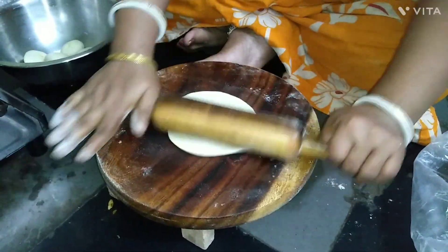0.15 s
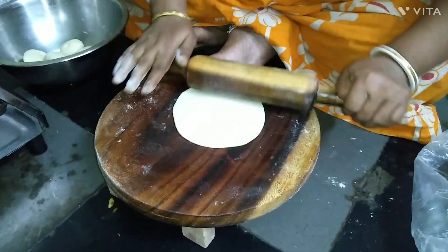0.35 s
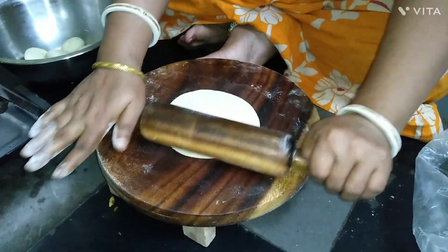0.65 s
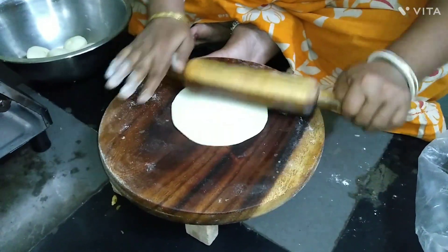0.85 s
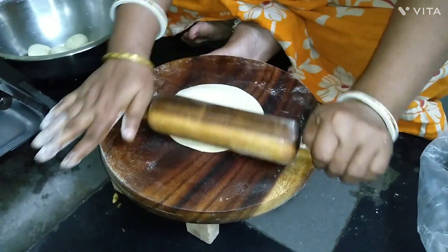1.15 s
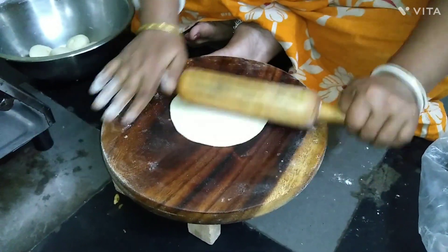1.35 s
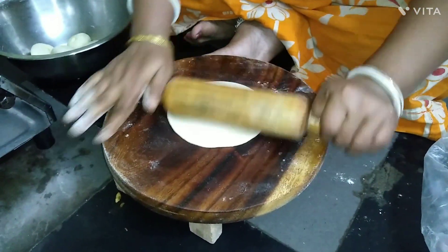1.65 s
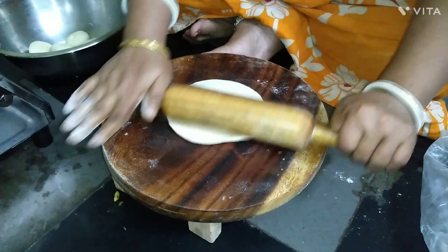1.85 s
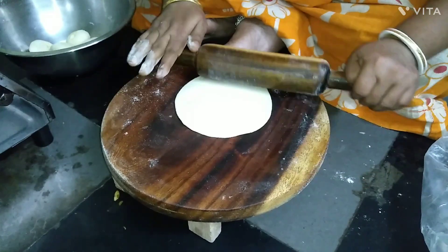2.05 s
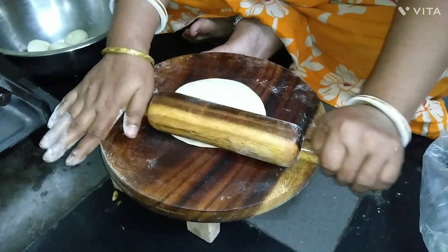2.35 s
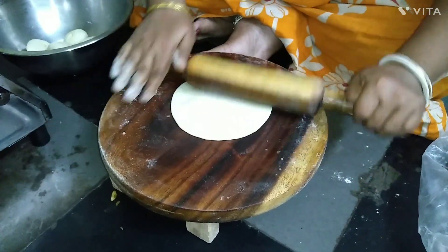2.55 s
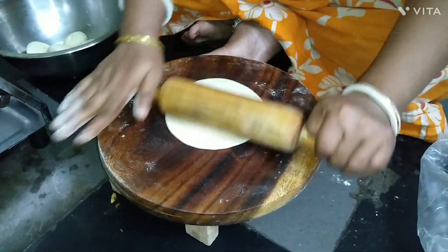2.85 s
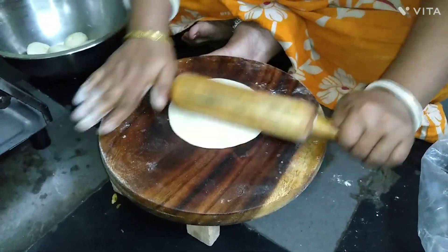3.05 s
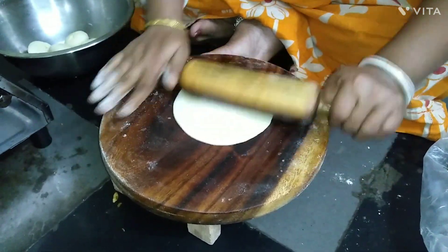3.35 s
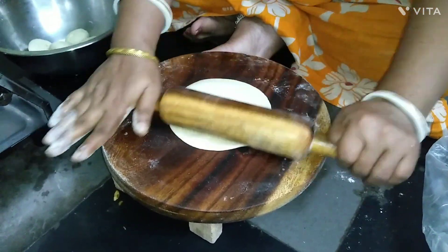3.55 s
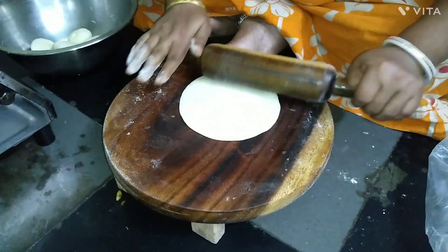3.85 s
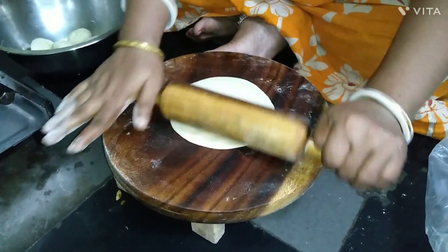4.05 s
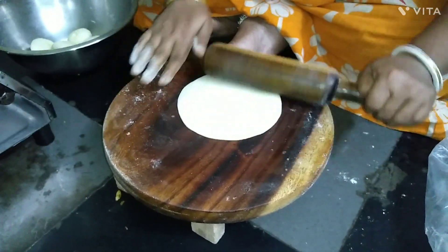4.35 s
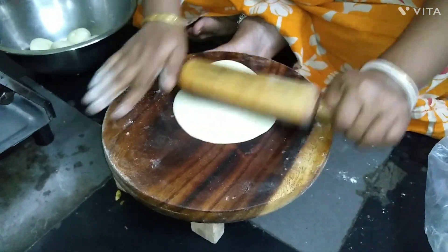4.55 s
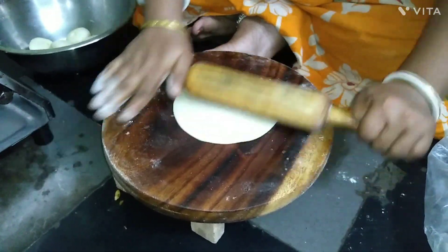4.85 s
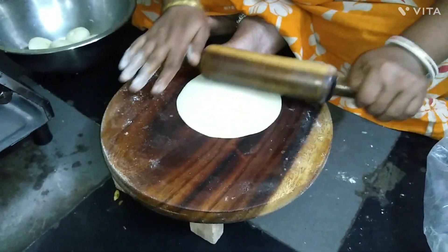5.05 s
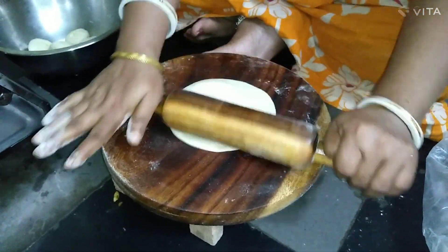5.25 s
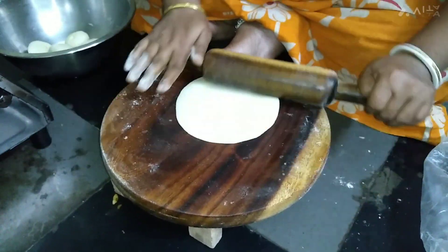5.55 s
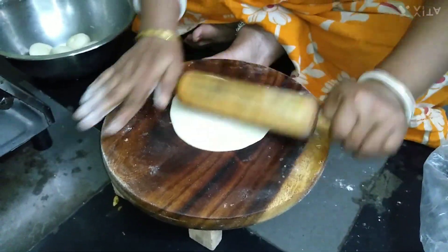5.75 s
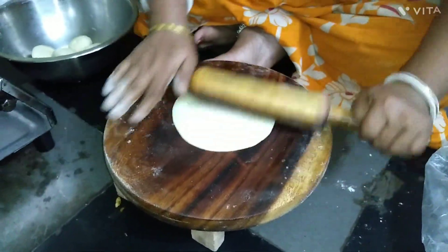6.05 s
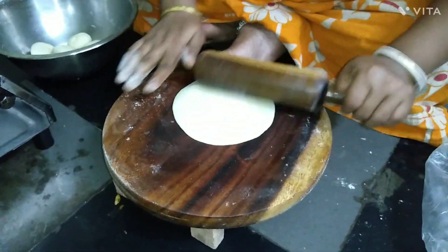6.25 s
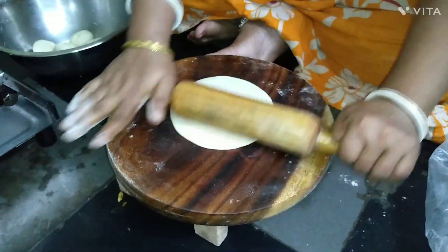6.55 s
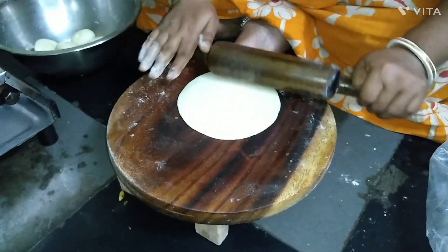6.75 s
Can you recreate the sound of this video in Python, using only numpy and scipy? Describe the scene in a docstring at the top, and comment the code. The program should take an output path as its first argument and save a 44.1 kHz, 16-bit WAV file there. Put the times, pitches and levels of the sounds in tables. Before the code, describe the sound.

Rhythmic dough rolling on a footed wooden board: handles rub in the palms, flour hisses, bangles snap and chatter, and the board thuds hollowly on its foot. Quieter return strokes creak between pushes. The pin taps the board once before the middle, and later a faint vehicle horn blares outdoors. Low hum, soft floor thumps and quiet air sit beneath, picked up by a close stereo microphone with a short room reflection.

```python
"""Bangles clack over the rub of a wooden rolling pin, worked to and fro on dough on a round, footed board.
Shaped noise rubs, hisses and swishes with each stroke; noise bursts make the clacks near top push speed.
The board rocks in decaying modes, its hollow creaks with stick-slip on the return, and the pin taps it once.
A harmonic horn blasts once far outside; a low hum, floor thumps and air lie under a small hard room.
Two differently tuned microphone ports pick it all up."""
import sys
import numpy as np
from scipy import signal
from scipy.fft import rfft, irfft
from scipy.io import wavfile
from scipy.ndimage import uniform_filter1d

SR = 44100
rng = np.random.default_rng(int(sys.argv[2]) if len(sys.argv) > 2 else 0)


def wav_out(sig):
    """Save sig, one row per channel (or a flat mono array), as 16-bit PCM at SR to the path in sys.argv[1]."""
    wavfile.write(sys.argv[1], SR, np.round(np.clip(np.atleast_2d(sig).T, -1, 1) * 32767).astype(np.int16))


N = 304290
TIME = np.arange(N) / SR


def undb(db):
    """Decibels to amplitude gain."""
    return 10 ** (np.asarray(db) / 20)


def unit(x):
    """Scale to rms 1."""
    return x / np.sqrt(np.mean(x ** 2))


def colour(x, points, size=4096):
    """Minimum-phase filter through (freq_hz, gain_db) points, built by folding the cepstrum."""
    freq_hz, gain_db = np.transpose(points)
    grid_hz = np.maximum(np.fft.rfftfreq(size, 1 / SR), 1)
    grid_db = np.interp(np.log(grid_hz), np.log(freq_hz), gain_db)
    cepstrum = irfft(np.log(undb(grid_db)))
    cepstrum[1:size // 2] *= 2
    cepstrum[size // 2 + 1:] = 0
    response = irfft(np.exp(rfft(cepstrum)))
    response = response.reshape((1,) * (x.ndim - 1) + (-1,))
    return signal.fftconvolve(x, response, axes=-1)[..., :x.shape[-1]]


def fade(t_s, t60_s):
    """Exponential decay, 60 dB down at t60_s."""
    return np.exp(-np.log(1000) * t_s / t60_s)


def walk(rate_hz):
    """Random wander: straight lines between normal draws made rate_hz times a second."""
    knots_s = np.arange(0, N / SR + 1, 1 / rate_hz)
    return np.interp(TIME, knots_s, rng.standard_normal(len(knots_s)))


def swell(middle_s, half_s):
    """Speed of one stroke: it gathers, peaks at 1 and dies away, 1/e at half_s either side."""
    return np.exp(-np.minimum(np.abs((TIME - middle_s) / half_s), 20) ** 1.5)


def add(track, start_s, sound):
    """Mix a sound into a track at a time."""
    start = max(int(start_s * SR), 0)
    part = track[..., start:start + sound.shape[-1]]
    part += sound[..., :part.shape[-1]]


def grains(per_s, spread_db):
    """Dense tiny slips of uneven size, drawn independently for each port."""
    slips = (rng.random((2, N)) < per_s / SR) * rng.standard_normal((2, N))
    boost = np.minimum(rng.exponential(size=(2, N)), 4)
    return slips * undb(spread_db * boost)


# long strokes: clack_s, rub_lead_s, rub_db, swish_db, clack_db, clack_body_db (below 7 kHz against treble)
PUSH_STROKES = [(0.0465, 0.015, -41, -45.5, -34.5, 4.5), (0.604, 0.0065, -46, -50.5, -46, 7.5),
                (1.2097, 0.052, -51.5, -54.5, -31, -10), (1.754, 0.022, -45.5, -55.5, -35.5, -9.5),
                (2.3392, 0.019, -50, -49.5, -31.5, -9.5), (2.9284, 0.02, -48, -49.5, -29.5, -6.5),
                (3.5014, 0.0068, -46.5, -48.5, -28, -10.5), (4.0805, 0.024, -52, -49.5, -32, -9),
                (4.689, 0.0064, -45.5, -48, -32, -0.5), (5.285, 0.034, -47.5, -47, -28, -7),
                (5.8723, 0.03, -47.5, -50.5, -31, -7.5), (6.4473, 0.027, -50, -49.5, -31, -7)]
# lighter strokes back: middle_s, effort_db
RETURN_STROKES = [(0.329, 2), (0.894, 2.5), (1.452, -0.5), (2.025, 1.2), (2.606, -0.5), (3.185, -4),
                  (3.776, -3.5), (4.352, -3), (4.957, 2), (5.551, -2.5), (6.138, -5), (6.722, -1)]
# handles in the palms: freq_hz, gain_db
RUB_SPECTRUM = [(200, -16.5), (900, -31.5), (1500, -18), (1900, -4), (2300, 4), (2650, -0.5), (3300, -17.5),
                (5000, -18), (16000, -65.5)]
# low wooden grain: freq_hz, gain_db
GRAIN_SPECTRUM = [(500, -11), (900, -19), (1250, -14.5), (1500, 5.5), (1750, 2), (2100, -1.5),
                  (4000, -43.5)]
# flour under the pin: freq_hz, gain_db
HISS_SPECTRUM = [(800, -17.5), (2500, 0), (3400, -8.5), (4750, -6), (5250, 2), (5650, 0.5), (6400, -8),
                 (7500, -4.5), (10000, -41.5), (16000, -33)]
# sliding bangles: freq_hz, gain_db
SWISH_SPECTRUM = [(2000, -19), (5000, -3.5), (7500, 2.5), (9000, 0), (11000, 0.5), (13500, -5),
                  (16000, -19)]
# in a push the handles rub first, then the bangles clack, then hiss and swish peak
SLIDE_LAG_S = 0.021
PUSH_HALF_S, SLIDE_HALF_S, SWISH_HALF_S, RETURN_HALF_S = 0.055, 0.059, 0.055, 0.055
PUSH_HISS_DB, PUSH_GRAIN_RE_RUB_DB = -51, -13
# return levels at 0 dB effort; swish grows faster than effort, rub slower
RETURN_RUB_DB, RETURN_GRAIN_DB, RETURN_HISS_DB, RETURN_SWISH_DB = -56, -56, -57, -66
SWISH_DB_PER_DB, RUB_DB_PER_DB = 2.6, 0.33


def rolling(uneven_db=3.0, slide_uneven_db=2, shift=0.038):
    """Handles rub in the palms, flour hisses and bangles slide: slip noise follows stroke speed; grip wavers."""
    rub_gain = grain_gain = hiss_gain = swish_gain = 0
    for clack_s, lead_s, rub_db, swish_db, _, _ in PUSH_STROKES:
        turning = swell(clack_s - lead_s, PUSH_HALF_S)
        slide_s = clack_s + SLIDE_LAG_S
        rub_gain = rub_gain + undb(rub_db) * turning
        grain_gain = grain_gain + undb(rub_db + PUSH_GRAIN_RE_RUB_DB) * turning
        hiss_gain = hiss_gain + undb(PUSH_HISS_DB) * swell(slide_s, SLIDE_HALF_S)
        swish_gain = swish_gain + undb(swish_db) * swell(slide_s, SWISH_HALF_S)
    for middle_s, effort_db in RETURN_STROKES:
        speed = swell(middle_s, RETURN_HALF_S)
        rub_effort_db = RUB_DB_PER_DB * effort_db
        rub_gain = rub_gain + undb(RETURN_RUB_DB + rub_effort_db) * speed
        grain_gain = grain_gain + undb(RETURN_GRAIN_DB + rub_effort_db) * speed
        hiss_gain = hiss_gain + undb(RETURN_HISS_DB + effort_db) * speed
        swish_gain = swish_gain + undb(RETURN_SWISH_DB + SWISH_DB_PER_DB * effort_db) * speed
    # changing pressure slides the pitch of the rub: read the noise at a varying rate
    travel = np.cumsum(1 + shift * walk(22)) % N
    steady_rub = colour(grains(5000, 0.37), RUB_SPECTRUM)
    scrape = np.array([np.interp(travel, np.arange(N), port) for port in steady_rub])
    rub = rub_gain * unit(scrape)
    grain = grain_gain * unit(colour(grains(2000, 0.91), GRAIN_SPECTRUM))
    hiss = hiss_gain * unit(colour(grains(10000, 1.1), HISS_SPECTRUM))
    swish = swish_gain * unit(colour(grains(16000, 1.5), SWISH_SPECTRUM))
    gripped = (rub + grain) * undb(uneven_db * walk(70))
    sliding = (hiss + swish) * undb(slide_uneven_db * walk(120))
    return gripped + sliding


# light touches, full before a clack and thin as the hands turn: start_s, level_db, body_db
BANGLE_TOUCHES = [(0.5883, -46.5, 10.5), (0.6993, -41.5, -18), (1.0105, -56.5, -24), (1.172, -58, 15.5),
                  (1.5793, -46.5, -43), (2.307, -54, 11), (2.7781, -56.5, -14), (3.3277, -54.5, -29),
                  (5.8392, -52, 10.5)]
# bangle contact: freq_hz, gain_db
BANGLE_SPECTRUM = [(300, -67), (1200, -12.5), (2200, -2), (3600, 9.5), (6000, 2), (9000, 10), (12000, -4),
                   (16000, -11)]


def bangles(clack_db=3.5, snap_t60_s=0.01, chatter_db=-15, chatter_t60_s=0.18, body_share=0.78,
            port_tilt_db=-1, thin_db=-13, sparkle_db=11):
    """Bangles snap together and chatter: noise with a fast and a slow decay, body set per contact."""
    t = TIME[:SR // 8]
    snap = fade(t, snap_t60_s) + undb(chatter_db) * fade(t, chatter_t60_s)
    body_filter = signal.butter(2, 7000, fs=SR, output="sos")
    track = np.zeros((2, N))
    clacks = [(s, db, body_db) for s, _, _, _, db, body_db in PUSH_STROKES]
    for start_s, level_db, body_db in clacks + BANGLE_TOUCHES:
        contact = rng.standard_normal((2, len(t))) * snap
        body = signal.sosfiltfilt(body_filter, contact)
        body_gain = undb(body_share * (body_db + 6.5))
        contact = contact + (body_gain - 1) * body
        # the thinnest contacts gain treble above 10 kHz
        thinness = np.clip(body_db / thin_db - 1, 0, 1)
        contact = colour(contact, [(9300, 0), (10800, thinness * sparkle_db)])
        add(track, start_s, contact * undb(level_db + clack_db))
    return colour(track, BANGLE_SPECTRUM) * undb([[port_tilt_db], [-port_tilt_db]])


# board rocking onto its foot: start_s, level_db
BOARD_KNOCKS = [(0.0681, -30), (0.6514, -34), (1.224, -32), (1.7965, -34.5), (2.402, -45), (2.9603, -43),
                (3.5348, -32), (4.1508, -39), (4.7164, -31.5), (5.2986, -35.5), (5.9231, -42.5)]
# board modes: freq_hz, level_db, t60_s
BOARD_MODES = [(272, 4.5, 0.078), (323.6, 1.5, 0.06), (400.3, -2, 0.065), (627.6, -2, 0.078),
               (661, 2, 0.039), (726, -8.5, 0.13), (886, -46, 0.065), (1150, -6, 0.073), (1431, -7, 0.049),
               (1543, -3, 0.061)]
# dull contact noise: freq_hz, gain_db
THUD_SPECTRUM = [(60, -17.5), (180, -13), (280, 11), (480, -1.5), (680, 0), (900, -2), (1450, -4),
                 (1900, -27), (4000, -24.5), (12000, -68.5)]
# knocks above the even level are brighter
EVEN_KNOCK_DB, HARDNESS_DB_PER_DB = -36, 0.97


def knocks(ring_db=-6, thud_db=13, thud_t60_s=0.0059, rattle_db=-15, rattle_t60_s=0.097,
           bounce_s=0.002858, first_db=-5):
    """The foot touches, lands fully a moment later and rattles: modes plus noise, brighter when harder."""
    t = TIME[:SR // 4]
    track = np.zeros(N)
    contact = fade(t, thud_t60_s) + undb(rattle_db) * fade(t, rattle_t60_s)
    for start_s, level_db in BOARD_KNOCKS:
        chance = rng.standard_normal((len(BOARD_MODES), 2))
        ring = 0
        # the weight of the hands shifts each mode a little
        for (freq_hz, mode_db, t60_s), (detune, place) in zip(BOARD_MODES, chance):
            tone = np.sin(2 * np.pi * freq_hz * (1 + 0.014 * detune) * t)
            ring = ring + undb(mode_db + 1.1 * place) * fade(t, t60_s) * tone
        # two independent thuds: first touch and landing share the ring
        thuds = colour(rng.standard_normal((2, len(t))) * contact, THUD_SPECTRUM)
        tilt_db = HARDNESS_DB_PER_DB * (level_db - EVEN_KNOCK_DB)
        tilt = [(330, -tilt_db / 2), (650, tilt_db / 3), (1400, tilt_db)]
        blows = undb(ring_db) * ring + undb(thud_db) * thuds
        touch, landing = undb(level_db) * colour(blows, tilt)
        add(track, start_s, undb(first_db) * touch)
        add(track, start_s + bounce_s, landing)
    return track


# board creaking under the returning pin: middle_s, half_s, level_db
BOARD_CREAKS = [(0.232, 0.012, -51), (0.314, 0.023, -46), (0.846, 0.039, -52), (1.414, 0.034, -48.5),
                (2.019, 0.021, -52.5), (2.57, 0.075, -57.5), (3.19, 0.048, -62), (3.791, 0.032, -47),
                (5.56, 0.032, -56.5), (6.134, 0.031, -44), (6.24, 0.066, -60), (6.684, 0.03, -44)]
# hollow under the board: freq_hz, gain_db
CREAK_SPECTRUM = [(150, -41.5), (270, -5), (400, -3), (475, 2.5), (620, -1), (780, -32), (1100, -21),
                  (2500, -55)]


def creaks(creak_db=-1, slip_hz=118, jitter=0.2):
    """Uneven stick-slip pulses and steady drag noise sound the hollow under the board."""
    phase = np.cumsum(slip_hz * np.exp(jitter * walk(150))) / SR
    slips = np.diff(np.floor(phase), prepend=0) * undb(walk(90))
    voice = colour(unit(slips) + rng.standard_normal(N), CREAK_SPECTRUM)
    # the hands keep the load even: level out over 1/30 s so only the stroke sets loudness
    voice = voice / np.sqrt(uniform_filter1d(voice ** 2, size=SR // 30))
    stroke_gain = sum(undb(db + creak_db) * swell(s, half_s) for s, half_s, db in BOARD_CREAKS)
    return voice * stroke_gain


# pin tapping the board: start_s, level_db
PIN_TAPS = [(2.6064, -30.5)]


def taps(tap_db=6, contact_s=0.00078, pitch_hz=2150, t60_s=0.012, crack=0.22):
    """Bare wood on wood: a short, dry decaying sine with some grain noise."""
    t = TIME[:SR // 10]
    track = np.zeros(N)
    envelope = np.minimum(t / contact_s, 1) * fade(t, t60_s)
    for start_s, level_db in PIN_TAPS:
        noise = unit(colour(rng.standard_normal(len(t)), GRAIN_SPECTRUM))
        note = np.sin(2 * np.pi * pitch_hz * t) + crack * noise
        add(track, start_s, undb(level_db + tap_db) * envelope * note)
    return track


# horn harmonics: harmonic_number, level_db
HORN_HARMONICS = [(1, -13), (6, -11.5), (7, -1), (8, 3.5), (9, -5), (10, -14)]
HORN_START_S, HORN_HOLD_S, HORN_ATTACK_S, HORN_T60_S, HORN_DB = 4.69, 0.38, 0.025, 0.73, -56


def horn(pitch_hz=389, flutter_db=3.3, waver=0.0027):
    """A vehicle horn's buzzing diaphragm far outside; echoes on the way flutter each harmonic on its own."""
    phase = 2 * np.pi * np.cumsum(pitch_hz * (1 + waver * walk(40))) / SR
    ports = np.zeros((2, N))
    for port in ports:
        for number, level_db in HORN_HARMONICS:
            flutter = undb(level_db + flutter_db * walk(45))
            port += flutter * np.sin(number * phase + 1.2 * walk(40))
    t = TIME - HORN_START_S
    attack = np.clip(t / HORN_ATTACK_S, 0, 1)
    blast = attack * fade(np.maximum(t - HORN_HOLD_S, 0), HORN_T60_S)
    return ports * blast * undb(HORN_DB)


# appliance hum: pitch_hz, rms_db
HUM_TONES = [(60.5, -63), (115, -63.5), (162, -74)]
# weight shifting on board and floor: middle_s, half_s, level_db
WEIGHT_SHIFTS = [(0.12, 0.059, -44), (0.456, 0.082, -52), (1.546, 0.033, -46.5), (2.344, 0.038, -48),
                 (2.78, 0.081, -52), (4.007, 0.074, -46), (4.194, 0.023, -44), (4.346, 0.095, -48),
                 (5.926, 0.063, -45)]
# thump through the floor: freq_hz, gain_db
THUMP_SPECTRUM = [(20, -57), (38, -17.5), (58, 10), (80, 0), (105, -8.5), (150, -22.5), (300, -42.5),
                  (1000, -64.5)]
# quiet room air: freq_hz, gain_db
AIR_SPECTRUM = [(20, -19), (38, -8), (60, -4), (80, 10.5), (120, 3.5), (200, -7), (500, -14.5), (1000, -20),
                (2400, -19.5), (4000, -34.5), (12000, -49.5), (16000, -58)]


def background(air_db=-61, rumble_db=2.0, waver_db=3.0, side_db=-9):
    """Hum of wandering sines, dull floor thumps of swelling low noise, and quiet air noise."""
    hum = 0
    for pitch_hz, rms_db in HUM_TONES:
        gain = undb(rms_db + waver_db * walk(11)) * np.sqrt(2)
        phase = 2 * np.pi * np.cumsum(pitch_hz + 2.46 * walk(12)) / SR
        hum = hum + gain * np.sin(phase)
    # each noise is mostly common to the ports
    thump_noise = rng.standard_normal(N) + undb(side_db) * rng.standard_normal((2, N))
    thumps = unit(colour(thump_noise, THUMP_SPECTRUM))
    weight = sum(undb(db + rumble_db) * swell(s, half_s) for s, half_s, db in WEIGHT_SHIFTS)
    air_noise = rng.standard_normal(N) + 0.45 * rng.standard_normal((2, N))
    air = unit(colour(air_noise, AIR_SPECTRUM))
    return hum + thumps * weight + air * undb(air_db + 2.9 * walk(5.23))


ROOM_T60_S = 0.26


def room(x, wet_db, shared_hz=800):
    """Close hard walls: convolve with a dense decaying noise tail whose bass is common to both ports."""
    t = TIME[:SR // 2]
    noise = rng.standard_normal((2, len(t)))
    low_pass = signal.butter(2, shared_hz, fs=SR, output="sos")
    high_pass = signal.butter(2, shared_hz, "high", fs=SR, output="sos")
    low = signal.sosfilt(low_pass, rng.standard_normal(len(t)))
    high = signal.sosfilt(high_pass, noise)
    build_up = 1 - fade(t, 0.031)
    tail = (low + high) * fade(t, ROOM_T60_S) * build_up
    tail = unit(tail) / np.sqrt(len(t))
    x = x * np.ones((2, 1))
    return x + undb(wet_db) * signal.fftconvolve(x, tail, axes=1)[:, :N]


def scene():
    """All sources in and around the kitchen."""
    rubbing = room(rolling() + creaks(), wet_db=-8.5)
    clacking = room(bangles(), wet_db=-4.5)
    wood = room(knocks() + taps(), wet_db=-6.5)
    return rubbing + clacking + wood + horn() + background()


# left port cavity: freq_hz, gain_db
LEFT_RESPONSE = [(100, -2.5), (1200, 3.5), (1800, 0), (2150, 4.5), (2370, 11), (2650, 0), (3100, 3.5),
                 (4500, 2.5), (6500, 2), (7800, -27), (8800, -10.5), (16000, -5)]
# right port cavity: freq_hz, gain_db
RIGHT_RESPONSE = [(100, 0), (700, 6), (1400, -0.5), (2000, -10.5), (2500, -4.5), (3500, 0), (6500, 3.5),
                  (7900, -4.5), (8550, 9), (10000, 8), (11500, 3.5), (16000, 3)]
TOP_HZ = 16300


def record(dry, hiss_db=-77):
    """Each microphone port has its own cavity resonance; electronics hiss faintly and the top is cut."""
    ports = np.array([colour(dry[0], LEFT_RESPONSE), colour(dry[1], RIGHT_RESPONSE)])
    hiss = undb(hiss_db) * colour(rng.standard_normal((2, N)), [(11000, 5.5), (15000, -5.0)])
    top_cut = signal.ellip(8, 0.2, 70, TOP_HZ, fs=SR, output="sos")
    return signal.sosfilt(top_cut, ports + hiss)


dry = scene()
out = record(dry)
wav_out(out)
```